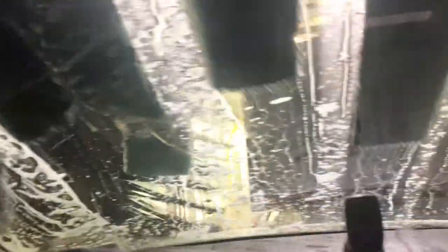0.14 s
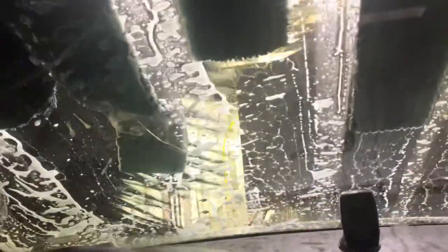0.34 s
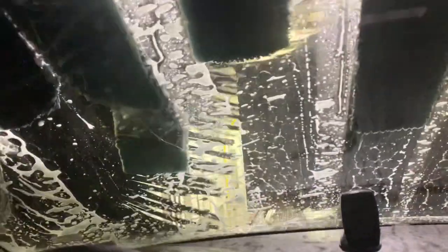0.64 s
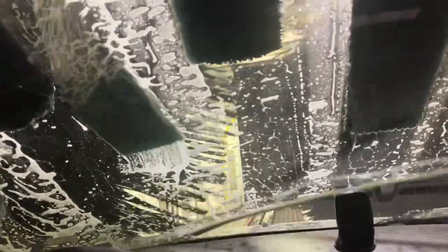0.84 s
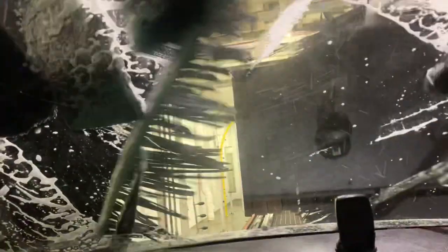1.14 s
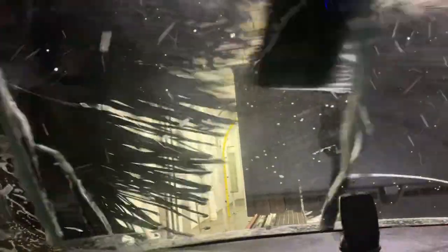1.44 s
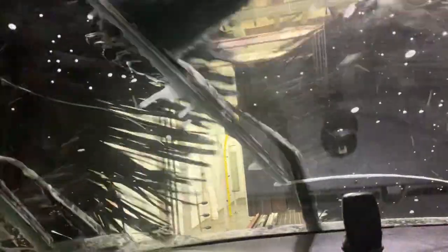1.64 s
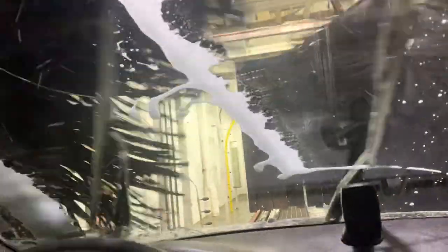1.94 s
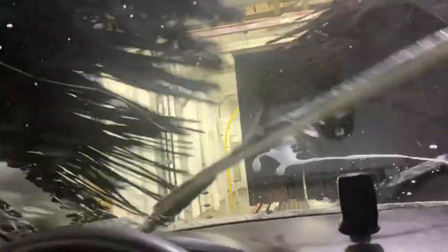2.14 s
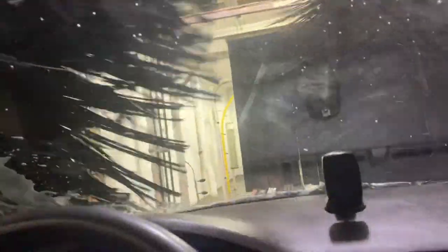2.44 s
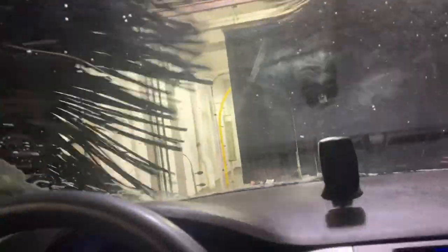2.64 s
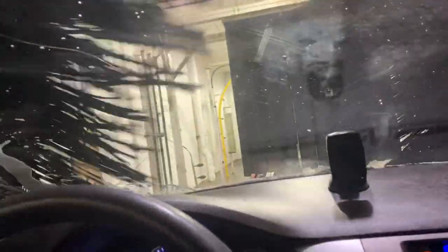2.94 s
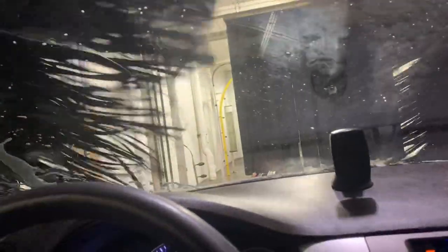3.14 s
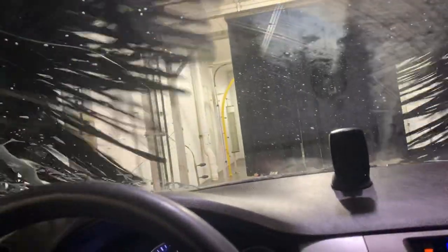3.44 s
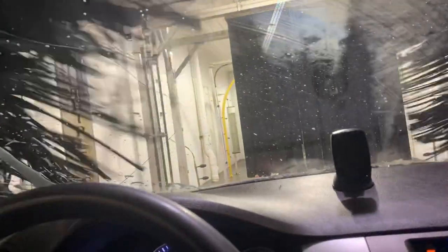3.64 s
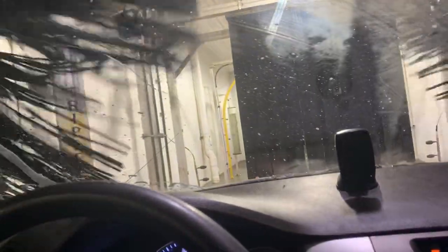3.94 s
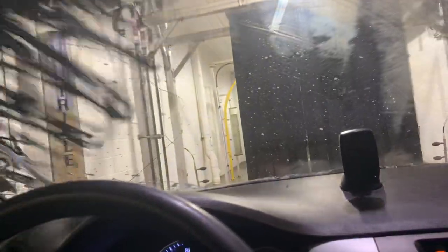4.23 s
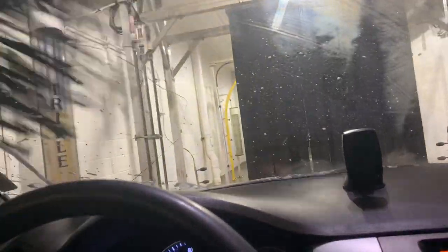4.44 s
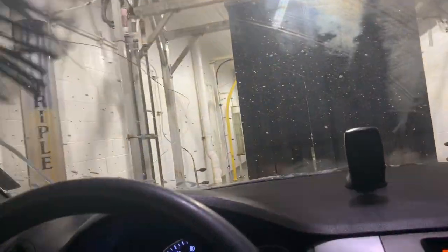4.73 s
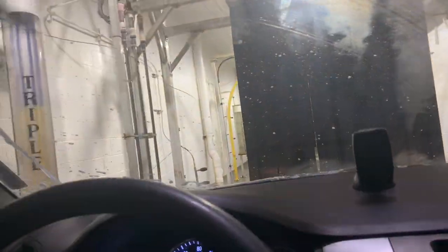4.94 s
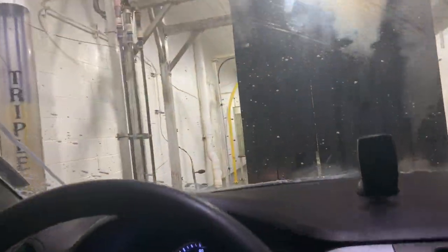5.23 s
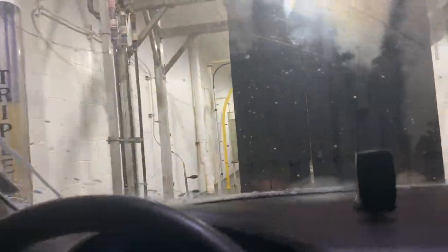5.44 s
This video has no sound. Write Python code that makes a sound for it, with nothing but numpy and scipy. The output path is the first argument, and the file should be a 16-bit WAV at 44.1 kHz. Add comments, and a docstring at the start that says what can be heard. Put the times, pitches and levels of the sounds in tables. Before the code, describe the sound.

A stereo perspective from the driver's seat of a closed, acoustically dry car. From 0 to 1 second, wet cloth drags and slaps fairly lightly over glass and panels, above a low rumble and the steady dull roar of machinery outside. Slaps strengthen from about 0.6 seconds. Around 1.2 seconds the brushes bear down: heavy, soft-edged booms arrive irregularly, roughly ten a second, starting higher and sinking to deep bass by 2 seconds. Through 4.9 seconds they tumble on with panel knocks, sharp metallic raps, swishing fibres, faint spray and splats, briefly easing whenever cloth lifts. Especially strong blows land near 2.15, 3.3, 3.55 and 4.2 seconds. After 4.9 the pounding stops; scrubbing thins, a hollow low drone rises around 5.2, a splat and small raps sound near 5.1, and a last soft, deep thump comes at 5.55.

```python
"""Automatic car wash, from the driver's seat

Two microphones in the closed cabin: wet cloth strips drag over the glass, then spinning side brushes bear on
the body. Close by, heavy blows drum the panels (noise bursts tuned to a moving pitch), and each slap of cloth
knocks a panel, swishes over the glass and throws spray (three coloured patters of tiny impacts). Skin panels
groan (resonated noise); bristle tips, splats and drops tick on the glass. Outside, the machinery roars dully
(steady coloured noise) and hums one hollow, shifting note (resonated noise)."""
import sys
import numpy as np
from scipy import signal
from scipy.fft import rfft, irfft, next_fast_len
from scipy.io import wavfile
from scipy.ndimage import uniform_filter1d

SR = 44100
rng = np.random.default_rng(int(sys.argv[2]) if len(sys.argv) > 2 else 0)


def inscribe(sig):
    """Save sig as 16-bit PCM at rate SR to the path in sys.argv[1].

    A 1-D sig is mono; a 2-D sig holds one channel per row.
    Samples are clipped to [-1, 1] before scaling.
    """
    pcm = np.round(np.clip(np.atleast_2d(sig).T, -1, 1) * 32767)
    wavfile.write(sys.argv[1], SR, pcm.astype(np.int16))


N = 246959
TIME = np.arange(N) / SR  # s

# Heaviest brush blows, before body shake and gain control: start_s, length_s, level_db
THUDS = [(1.19, 0.046, -21.5), (1.298, 0.034, -11), (1.417, 0.012, -12.5), (1.501, 0.013, -9.5),
         (1.578, 0.04, -9), (1.734, 0.031, -12.5), (1.877, 0.063, -15.5), (1.952, 0.011, -6.5),
         (2.023, 0.047, -12.5), (2.147, 0.027, -3), (2.245, 0.048, -12.5), (2.304, 0.0075, -12),
         (2.379, 0.016, -5.5), (2.455, 0.045, -10.5), (2.592, 0.05, -12.5), (2.749, 0.13, -18.5),
         (2.848, 0.082, -14), (2.941, 0.0186, -9), (3.025, 0.016, -8), (3.072, 0.011, -12),
         (3.216, 0.054, -12), (3.316, 0.011, -4), (3.448, 0.02, -8.5), (3.561, 0.014, -1.5),
         (3.678, 0.047, -12), (3.746, 0.016, -11), (3.872, 0.047, -9), (4.029, 0.058, -12.5),
         (4.106, 0.036, -5.5), (4.205, 0.011, -3.5), (4.294, 0.03, -9), (4.453, 0.032, -7.5),
         (4.541, 0.0062, -5.5), (4.631, 0.027, -10.5), (4.764, 0.18, -15), (4.871, 0.016, -12.5),
         (4.916, 0.032, -9), (5.544, 0.04, -11)]
# Pitch of the drumming panel as the brushes travel along the body: start_s, pitch_hz
PANEL_PITCH = [(1.3, 194), (1.9, 122), (3.3, 103), (4.5, 106), (4.9, 136), (5.55, 69)]
# How hard the side brushes bear on the body: start_s, rumble_db
PRESSURE = [(0, -24.5), (.8, -26), (1.15, -20), (1.4, -20), (1.9, -16.5), (2.65, -18.5), (3.3, -15),
            (4.1, -18), (4.7, -20), (5.1, -19.5), (5.6, -20.5)]
# Gain of the deepest drumming as the body is shaken: start_s, gain_db
DEPTH = [(0, -6), (.8, -4.5), (1.3, -10), (1.7, -2.5), (2.8, -3), (4, -1), (5, -1), (5.6, 0)]
# Loudest slaps of wet cloth, relative to a slap of 0 dB: start_s, length_s, strength_db
SLAPS = [(0.095, 0.014, -7.5), (0.17, 0.012, -11.5), (0.277, 0.0084, -11.5), (0.417, 0.04, -7),
         (0.611, 0.0072, -2.5), (0.655, 0.016, -3.5), (0.822, 0.019, -1.5), (0.867, 0.015, 0),
         (0.945, 0.0082, -8), (0.99, 0.0097, -2.5), (1.049, 0.025, -1.5), (1.146, 0.014, -1),
         (1.2, 0.012, -5.5), (1.266, 0.021, 1.5), (1.347, 0.0094, 1.5), (1.411, 0.022, -3.5),
         (1.492, 0.022, 4.5), (1.56, 0.017, 1.5), (1.693, 0.042, -4), (1.9, 0.032, -4), (1.949, 0.019, 0),
         (2.02, 0.019, -5), (2.058, 0.011, -8), (2.142, 0.036, 3), (2.219, 0.03, -5), (2.295, 0.015, 3),
         (2.363, 0.047, -1.5), (2.424, 0.014, -4), (2.449, 0.022, -2), (2.486, 0.0077, -4.5),
         (2.576, 0.026, 1.5), (2.685, 0.01, -11), (2.721, 0.011, -1.5), (2.772, 0.013, -6),
         (2.836, 0.014, -1), (2.889, 0.019, -0.5), (2.933, 0.011, -1.5), (3.002, 0.011, -6),
         (3.032, 0.022, 0.5), (3.202, 0.018, 0), (3.26, 0.047, -1), (3.318, 0.0072, 2),
         (3.356, 0.0083, 0.5), (3.418, 0.013, 0), (3.442, 0.016, 4), (3.564, 0.016, 6), (3.625, 0.008, -7),
         (3.68, 0.0086, 2.5), (3.744, 0.013, 1), (3.79, 0.011, -5), (3.868, 0.055, 0), (3.982, 0.018, -3),
         (4.036, 0.012, 1), (4.1, 0.027, 1.5), (4.128, 0.01, -2.5), (4.245, 0.015, -2),
         (4.275, 0.026, -1.5), (4.348, 0.0099, -5), (4.407, 0.017, 1), (4.478, 0.037, -1.5),
         (4.571, 0.011, -5), (4.726, 0.017, -5.5), (4.789, 0.013, -9), (4.865, 0.01, -4), (4.912, 0.04, -3),
         (5.083, 0.036, -9), (5.195, 0.013, -7), (5.546, 0.028, -13)]
# How hard the cloth scrubs between slaps, relative: start_s, strength_db
SCRUB = [(0, -12), (.35, -11), (.7, -7.5), (1.1, -6), (2.3, -4.5), (2.65, -5.5), (3.3, -4.5), (4.1, -4.5),
         (4.65, -7), (5, -5.5), (5.25, -9), (5.45, -10.5), (5.6, -7.5)]
# Moments when the cloth lifts off the glass (negative: it presses a little harder): start_s, drop_db
LIFTS = [(.59, 2.5), (.785, 3), (.912, 3.5), (1.12, 2), (1.235, 3), (1.385, -1), (1.46, -1), (1.655, 4.5),
         (1.777, 10), (1.989, 9), (2.19, 8), (2.526, 4), (2.632, 10), (2.868, 7), (3.122, 4), (3.48, 6),
         (3.5, 5), (3.712, 2.5), (3.772, 3.5), (3.822, 2.5), (4.168, 1), (4.215, -0.5), (4.328, 5),
         (4.672, 4)]
# Rubbing of flat wet cloth, as gain on the middle of the swish: start_s, gain_db
RASP = [(0, -7.5), (.6, -4), (1.1, 0.5), (1.5, -1.5), (2.3, -1), (3, -4.5), (3.7, -4), (4.4, -4.5),
        (5, -3.5), (5.6, -4.5)]
# Hard raps of a strip end on the bodywork: start_s, level_db, power_decay_s
RAPS = [(.279, -26.5, 0.014), (.605, -17.5, 0.0051), (.655, -17.5, 0.0034), (1.043, -19.5, 0.022),
        (1.168, -22, 0.025), (1.288, -18.5, 0.01), (1.425, -28, 0.0063), (1.499, -18, 0.021),
        (1.564, -24, 0.0062), (1.631, -20, 0.0055), (1.69, -23.5, 0.0058), (1.722, -19, 0.011),
        (1.803, -20, 0.0036), (1.836, -20, 0.013), (1.941, -19.5, 0.015), (2.139, -14, 0.0071),
        (2.231, -24, 0.012), (2.553, -22, .0082), (2.645, -26, .007), (2.686, -25.5, 0.012),
        (2.723, -19, 0.0066), (2.831, -17, 0.0072), (2.933, -16, 0.0077), (3.04, -20, 0.0065),
        (3.101, -21, .024), (3.167, -17, 0.0084), (3.546, -16.5, 0.02), (3.682, -17.5, 0.011),
        (3.788, -17.5, 0.0057), (3.895, -21, 0.018), (4.038, -23, 0.007), (4.099, -17, 0.0098),
        (4.134, -20.5, 0.0087), (4.195, -29, .008), (4.287, -24, 0.0065), (4.507, -21, 0.0076),
        (5.108, -21.5, 0.018), (5.202, -28.5, .008), (5.306, -23, 0.011)]
# Notes of the skin panels, levels relative: pitch_hz, level_db, width_hz
PANEL_NOTES = [(248, -30, 33), (332.3, -39.5, 23), (441.4, -36, 22), (517.4, -37, 38), (608.6, -34.5, 10.3),
               (880, -40, 52), (1083, -36.5, 89), (1270, -43.5, 42)]
# Sharp splats of water on the windscreen, levels relative: start_s, level_db, power_decay_s
SPLATS = [(.434, -40, 0.0073), (.816, -33, 0.0089), (1.141, -33.5, 0.0064), (1.287, -25, 0.0064),
          (1.492, -28.5, 0.0049), (1.877, -28, 0.0057), (2.012, -35, 0.0057), (2.231, -33, 0.012),
          (2.293, -34, 0.0059), (2.644, -37, 0.0044), (2.830, -36, 0.0048), (2.883, -45, 0.0036),
          (3.166, -23, 0.0075), (3.876, -39, 0.0067), (3.906, -44, .005), (4.198, -37, 0.0051),
          (4.264, -36, .005), (4.285, -33, .005), (4.401, -46, 0.0036), (4.676, -42, .004),
          (5.103, -27, 0.0076), (5.136, -31, 0.0035)]
# Hard drops that ping the glass: start_s, level_db, pitch_hz
TICKS = [(2.068, -22, 2170), (2.827, -36, 7000), (3.165, -23, 1400), (4.764, -35, 5960), (5.107, -25, 1400)]
# Level of the machinery's hollow hum: start_s, level_db
DRONE_LEVEL = [(0, -28), (.6, -43.5), (1.1, -31), (2.2, -31), (3.5, -36), (4.4, -33), (5.2, -24),
               (5.6, -30.5)]
# Pitch of the drone: start_s, pitch_hz
DRONE_PITCH = [(0, 308), (1.1, 348), (4.4, 358), (4.9, 361), (5.1, 308), (5.3, 354), (5.6, 296)]

# Colour of the drumming body: frequency_hz, relative_db
BODY_COLOUR = [(10, -54), (25, -63), (38, -3.5), (52, 3), (85, 2), (130, -3), (180, -3), (230, -9),
               (280, -10.5), (750, -100)]
# Colour of a knocked panel: frequency_hz, relative_db
PANEL_COLOUR = [(170, -6), (290, -18), (355, 3.5), (420, -2), (520, -4), (620, -6.5), (730, -15), (880, -6),
                (1000, -10.5), (1130, -8), (1250, -37), (1900, -85)]
# Colour of cloth on glass: frequency_hz, relative_db
GLASS_COLOUR = [(800, -65), (1230, -2), (1500, -8), (1900, -3.5), (2350, -6), (2900, -13), (3600, -14.5),
                (4250, -14), (4900, -24), (7500, -67)]
# Colour of the spray: frequency_hz, relative_db
SPRAY_COLOUR = [(3300, -53), (5000, -2), (6500, -6.5), (8000, -8), (10000, -10.5), (12000, -17.5),
                (14000, -17), (14900, -20), (19000, -76)]
# Colour of a rap on metal: frequency_hz, relative_db
RAP_COLOUR = [(120, 1), (270, 16.5), (450, 18), (620, 12.5), (1100, -0.5), (2200, -7.5), (4300, -34),
              (8000, -85)]
# Colour of a splat: frequency_hz, relative_db
SPLAT_COLOUR = [(700, -16), (1500, 17), (3000, 6.5), (6500, -3), (10000, -5.5), (14500, -12), (18000, -60)]
# Colour of the machinery through the closed cabin: frequency_hz, relative_db
ROAR_COLOUR = [(12, -60), (30, -12), (60, -27), (135, 14.5), (180, -28), (225, -3), (310, 5.5), (450, -5),
               (700, 1), (1100, -13), (1600, -9), (2300, -32), (4200, -22.5), (7000, -37.5), (14000, -109),
               (19000, -80)]
# No colouring: frequency_hz, relative_db
FLAT_COLOUR = [(20, 0), (20000, 0)]
# Likeness of the two microphones, 0 unrelated to 1 alike: frequency_hz, likeness
LIKENESS = [(60, 0.96), (190, 0.97), (310, 0.94), (520, 0.62), (760, 0.37), (900, 0.67), (1150, 0.61),
            (1330, 0.38), (2000, 1), (2600, 0.033), (5500, 0.12), (8000, 0.1), (10000, 1)]
# Side each band leans to: frequency_hz, left_minus_right_db
LEAN = [(190, 0), (260, -3), (380, 2.2), (470, -.5), (600, 1.3), (1000, 2), (1350, 0.5), (1550, 1),
        (3500, -0.5), (4500, -.5), (5900, -3), (7200, -0.5), (10000, 0)]

KNOCK_DB, SWISH_DB, SPRAY_DB = -22.5, -31, -47  # base levels of the three voices of the cloth
KNOCK_FOLLOWS = 0.8  # dB of panel knock per dB of scrubbing
THUD_KNOCK_DB = -18.5  # panel knock of a heavy blow, relative to its drumming
FLICKS_PER_S, FLICK_S, FLICK_JITTER = 14, 0.013, 0.33  # rate, length, jitter as a share of the spacing
CABIN_T60 = 0.067  # s
EDGE_HZ = 15500  # upper band limit


def thuds(focus_octaves=0.94, lag_ms=0.041, size=12288):
    """Each blow is a flurry of pushes on one panel, which drums round its own pitch."""
    out = np.zeros((2, N))
    t = (np.arange(size) - size // 2) / SR
    f, body_db = np.transpose(BODY_COLOUR)
    taper = signal.windows.tukey(size, .5)
    for s, length, db in THUDS:
        force = swell(t, length)
        octaves_off = np.log2(f / at(s, PANEL_PITCH))
        focused_db = body_db - 4.3 * (octaves_off / focus_octaves) ** 2
        colour = np.c_[f, np.maximum(focused_db, -90)]
        boom = heard(force * rng.standard_normal((2, size)), colour, lag_ms) * taper
        # heard() evens the burst, so its force is put back
        add(out, s + t[0], boom * gain_of(db) * np.sqrt(np.mean(force ** 2)))
    return out


def drumming(lift_share=0.35):
    """Countless soft strips keep the whole body rumbling; it eases whenever the cloth lifts."""
    pressure = gain_of(at(TIME, PRESSURE))
    force = pressure * flicks(depth=0.33, spread_db=-5) * contact() ** lift_share
    taps = patter(per_s=200, spread_db=1.0, smooth=0.35, echo=0.46)
    return force * heard(taps, BODY_COLOUR, lag_ms=0.31)


def shaken(pair, corner_hz=105):
    """Hanging strips only tap the skin of the car; the side brushes shake the whole body."""
    deep = signal.sosfiltfilt(signal.butter(2, corner_hz, fs=SR, output="sos"), pair)
    return pair + deep * (gain_of(at(TIME, DEPTH)) - 1)


def knocks(pulsing, scrub_db=-4):
    """Strip ends patter on the doors and roof, and every heavy blow knocks a panel too."""
    taps = patter(per_s=450, spread_db=1.5, smooth=0.93, echo=0.7)
    scrub = gain_of(scrub_db) * scrubbing(KNOCK_FOLLOWS) * pulsing
    light = gain_of(KNOCK_DB) * slapping(scrub, slap_db=-2.0)
    t = TIME[::20]
    heavy = sum((gain_of(db + THUD_KNOCK_DB) * swell(t - s, length)) ** 2 for s, length, db in THUDS)
    force = np.sqrt(light ** 2 + np.interp(TIME, t, heavy))
    return force * rippled(heard(taps, PANEL_COLOUR, lag_ms=0.32), ripple_db=1.5)


def swish():
    """Wet fibres flick and drag over the glass."""
    flicked = patter(per_s=1100, spread_db=3.5, smooth=0.76, echo=2.0)
    fibres = rippled(heard(flicked, GLASS_COLOUR, lag_ms=0.38), ripple_db=2.5)
    force = gain_of(SWISH_DB) * slapping(scrubbing())
    return force * mottled(fibres, patchy_db=0.78) * gain_of([[.4], [-.4]])  # slightly left


def spray():
    """Droplets flung off the cloth fizz on the windows."""
    droplets = patter(per_s=1500, spread_db=2.0, smooth=0.76, echo=2.1)
    fizz = rippled(heard(droplets, SPRAY_COLOUR, lag_ms=-0.3006), ripple_db=2.5)
    return gain_of(SPRAY_DB) * slapping(scrubbing()) * fizz * gain_of([[-.4], [.4]])  # slightly right


def raps():
    """A heavy strip end lands flat on the metal."""
    burst = patter(per_s=2200, spread_db=-1.0, smooth=0.15, echo=0.5)
    return bursts(RAPS, rise_s=0.00048) * heard(burst, RAP_COLOUR, lag_ms=0.38)


def flexing(level_db=-25, bend=0.033, uneven_db=2.5, follows=1.28):
    """Each skin panel is rubbed and thumped in its own time, and its note bends as the brush leans on it."""
    panels = 0
    for hz, db, width in PANEL_NOTES:
        rub = rng.standard_normal((2, N)) * gain_of(uneven_db * wander(per_s=12))
        bent_hz = hz * (1 + bend * wander(per_s=3))
        panels = panels + gain_of(db) * evened(resonate(rub, bent_hz, width))
    return gain_of(level_db) * scrubbing(follows) * contact() * heard(panels, FLAT_COLOUR, lag_ms=0.42)


def bristles(level_db=-41, per_s=260, low_hz=1600, high_hz=4600, cycles=10, tilt_db=-5, count=20):
    """Bristle tips tick on the glass, each ringing briefly at one of a set of pitches, softer the higher."""
    out, t = np.zeros((2, N)), TIME[:SR // 50]
    for hz in np.geomspace(low_hz, high_hz, count):
        tips = (rng.random(N) < per_s / count / SR) * rng.uniform(0.99, 1, N)
        tone = np.sin(2 * np.pi * (hz * t + rng.random((2, 1)) / 2))
        ring = np.exp(-t * hz / cycles) * tone
        pitch_gain = gain_of(tilt_db * np.log2(hz / low_hz))  # tilt in dB per octave
        out += pitch_gain * signal.oaconvolve(tips[None], ring, axes=1)[:, :N]
    return gain_of(level_db) * slapping(scrubbing()) * evened(out)


def splats(level_db=1):
    """A gout of water bursts on the glass and dies away in milliseconds."""
    burst = patter(per_s=5000, spread_db=2, smooth=.5, echo=0.32)
    return gain_of(level_db) * bursts(SPLATS, rise_s=0.00063) * heard(burst, SPLAT_COLOUR, lag_ms=-0.299)


def ticks(decay_s=0.0044, rise_s=0.00068, spread=0.11, count=6):
    """A hard drop pings the glass: a cluster of close, short-lived modes."""
    out, t = np.zeros((2, N)), TIME[:SR // 20]
    rise = np.sin(np.pi / 2 * np.minimum(t / rise_s, 1)) ** 2
    for s, db, hz in TICKS:
        modes = hz * (1 + spread * np.linspace(-1, 1, count))[:, None]
        ring = evened(np.sin(2 * np.pi * (modes * t + rng.random((2, count, 1)))).sum(1))
        add(out, s, gain_of(db) * ring * np.exp(-t / decay_s) * rise)
    return out


def drone(width_hz=85):
    """The machinery sounds one hollow resonance, whose pitch shifts over time."""
    hollow = resonate(rng.standard_normal((2, N)), at(TIME, DRONE_PITCH), width_hz)
    return gain_of(at(TIME, DRONE_LEVEL)) * heard(hollow, FLAT_COLOUR, lag_ms=0.55)


def machinery(level_db=-36):
    """Pumps and motors outside, muffled by the closed cabin: steady coloured noise."""
    return gain_of(level_db) * heard(rng.standard_normal((2, N)), ROAR_COLOUR, lag_ms=0.38)


def scrubbing(follows=1):
    """Amplitude of the steady scrubbing, for a voice that follows it by this share."""
    return gain_of(follows * at(TIME, SCRUB))


def slapping(scrub, slap_db=0):
    """Force of the cloth: slaps on top of the scrubbing, added in power."""
    t = TIME[::20]
    power = sum((gain_of(db + slap_db) * swell(t - s, length)) ** 2 for s, length, db in SLAPS)
    return np.sqrt(np.interp(TIME, t, power) + scrub ** 2) * contact()


def contact(lift_s=0.014):
    """Share of the cloth that touches the car, dipping where it lifts off."""
    t = TIME[::20]
    drop_db = sum(db * np.exp(-((t - s) / lift_s) ** 2) for s, db in LIFTS)
    return gain_of(-np.interp(TIME, t, drop_db))


def flicks(depth, spread_db):
    """Uneven pulsing of rms 1, as one light strip after another lands in loose succession."""
    t = TIME[::20]
    late, size = rng.standard_normal((160, 2)).T
    times = (np.arange(len(late)) + FLICK_JITTER * late) / FLICKS_PER_S
    landings = gain_of(spread_db * size[:, None]) * swell(t - times[:, None], FLICK_S)
    power = (landings ** 2).sum(0)
    return evened(np.sqrt(1 + depth ** 2 * np.interp(TIME, t, power / power.mean())))


def swell(t, length, steepness=2.23):
    """Force of a soft blow: the cloth lands quickly and drags off more slowly."""
    u = t / length
    return np.exp(-np.where(u < 0, steepness * u, u) ** 2 / 2)


def bursts(table, rise_s):
    """Amplitude of sudden hits that die away exponentially, added in power."""
    power, t = 0, TIME[::10]
    for s, db, decay in table:
        age = t - s
        fall = np.where(age < 0, (age / rise_s) ** 2, age / decay)
        power += gain_of(db) ** 2 * np.exp(-np.minimum(fall, 60))
    return np.sqrt(np.interp(TIME, t, power))


def patter(per_s, spread_db, smooth, echo):
    """Tiny impacts of fibres and drops, of uneven size, each with a diffuse cabin tail, over a smooth wash."""
    size = gain_of(spread_db * np.minimum(rng.exponential(1, N), 3))
    hits = evened(size * (rng.random(N) < per_s / SR))
    decay = gain_of(-60 * TIME[:SR // 10] / CABIN_T60) ** 2  # power
    tail_power = abs(signal.fftconvolve(hits ** 2, decay / decay.sum())[:N])
    diffuse = np.sqrt(echo ** 2 * tail_power + smooth ** 2) * rng.standard_normal((2, N))
    return hits * rng.choice([-1, 1], (2, N)) + diffuse


def resonate(pair, hz, width_hz):
    """A steep resonance whose pitch follows the curve hz."""
    turn = np.exp(2j * np.pi * np.cumsum(hz) / SR)
    r = np.exp(-np.pi * width_hz / SR)
    # shift the pitch down to zero, smooth, and shift back up
    return (turn * signal.lfilter([1], [1, -2 * r, r * r], pair / turn)).real


def wander(per_s):
    """Smooth random drift of rms 1: slow sines of up to per_s cycles a second."""
    hz = np.geomspace(per_s / 4, per_s, 12)[:, None]
    t = TIME[::100]
    drift = np.sin(2 * np.pi * (hz * t + rng.random(hz.shape))).sum(0)
    return evened(np.interp(TIME, t, drift))


def mottled(pair, patchy_db, rasp_hz=2100, rasp_width_hz=450, size=512):
    """Every fold of cloth has its own colour, and flat cloth changes the rasp in the middle."""
    hz, t, z = signal.stft(pair, SR, nperseg=size)
    patch = np.outer(np.hanning(10), np.hanning(10))
    patches = signal.fftconvolve(rng.standard_normal(z.shape[1:]), patch, "same")
    rasp_db = np.exp(-((hz[:, None] - rasp_hz) / rasp_width_hz) ** 2) * at(t, RASP)
    gain = gain_of(patchy_db * evened(patches) + rasp_db)
    return evened(signal.istft(z * gain, SR, nperseg=size)[1][:, :N])


def rippled(pair, ripple_db, size=1024):
    """The film of water keeps changing, so narrow resonances come and go."""
    z = signal.stft(pair, SR, nperseg=size)[2]
    ripple = np.outer(np.hanning(6), np.hanning(14))  # narrow in frequency, longer in time
    ripples = signal.fftconvolve(rng.standard_normal(z.shape[1:]), ripple, "same")
    return evened(signal.istft(z * gain_of(ripple_db * evened(ripples)), SR, nperseg=size)[1][:, :N])


def reflected(pair, strength=0.21, count=60):
    """Windows and dashboard return quick echoes, which comb the middle and treble."""
    taps = np.zeros(SR // 33)
    taps[rng.integers(40, len(taps), count)] = rng.choice([-1, 1], count)
    taps *= np.linspace(1, .3, len(taps))  # later echoes are weaker
    highpass = signal.butter(2, 800, "high", fs=SR, output="sos")
    taps = signal.sosfilt(highpass, taps / np.linalg.norm(taps))
    return pair + strength * signal.oaconvolve(pair, taps[None], axes=1)[:, :N]


def heard(pair, colour, lag_ms):
    """Colours and blends two signals into two microphones at rms 1, the right one lag_ms later."""
    size = next_fast_len(pair.shape[1])
    hz = np.fft.rfftfreq(size, 1 / SR)
    a, b = rfft(pair, size)
    same = np.clip(read(LIKENESS, hz), 0, 1)
    lean = gain_of(read(LEAN, hz) / 2)
    delay = np.exp(-2j * np.pi * hz * lag_ms / 1000)
    right = (same * a + np.sqrt(1 - same ** 2) * b) * delay
    spectra = np.array([a * lean, right / lean]) * gain_of(read(colour, hz))
    return evened(irfft(spectra, size)[:, :pair.shape[1]])


def gain_of(db):
    """Decibels to amplitude."""
    return 10 ** (np.asarray(db) / 20)


def evened(x):
    """Scales to rms 1."""
    return x / np.sqrt(np.mean(x ** 2) + 1e-20)


def at(t, table):
    """A table of (s, value), joined by straight lines and read at time t."""
    return np.interp(t, *np.transpose(table))


def read(points, hz):
    """A table of (Hz, value), read on a log-frequency axis."""
    f, value = np.transpose(points)
    return np.interp(np.log(hz + 1), np.log(f + 1), value)


def add(mix, s, sound):
    """Mixes a stereo sound in at time s, cut to fit."""
    start = round(s * SR)
    part = mix[:, max(start, 0):max(start + sound.shape[1], 0)]
    part += sound[:, max(-start, 0):][:, :part.shape[1]]


def scene():
    """Everything as heard from the driver's seat."""
    brushes = shaken(thuds() + drumming())
    slaps = knocks(flicks(depth=0.62, spread_db=3.5)) + swish() + spray()
    cloth = reflected(slaps) + bristles()
    return brushes + flexing() + cloth + raps() + splats() + ticks() + drone() + machinery()


def record(dry, knee_db=-13, share=0.54):
    """Fast gain control leans on the loudest blows, peaks are rounded off; then the band limit."""
    window = np.hanning(901)
    power = signal.fftconvolve((dry ** 2).mean(0), window / window.sum(), "same")
    over_db = np.maximum(10 * np.log10(abs(power) + 1e-12) - knee_db, 0)
    held = dry * gain_of(-share * uniform_filter1d(over_db, size=300))
    rounded = held / (1 + (held / .92) ** 8) ** (1 / 8)
    lowpass = signal.firwin(511, EDGE_HZ, window=("kaiser", 9), fs=SR)
    return signal.oaconvolve(rounded, lowpass[None], "same")


dry = scene()
out = record(dry)
inscribe(out)
```